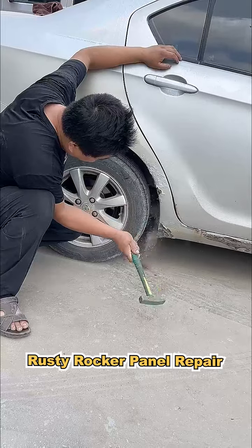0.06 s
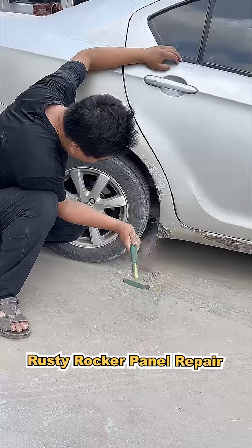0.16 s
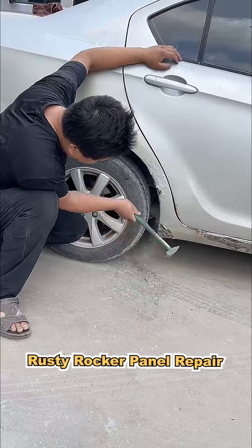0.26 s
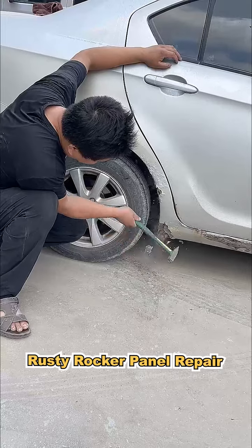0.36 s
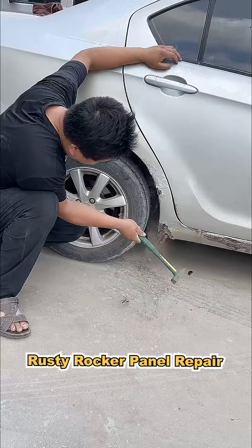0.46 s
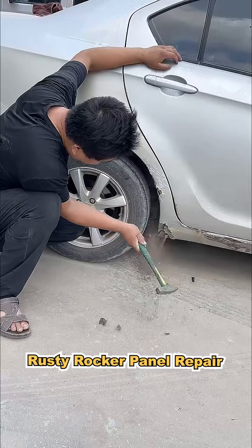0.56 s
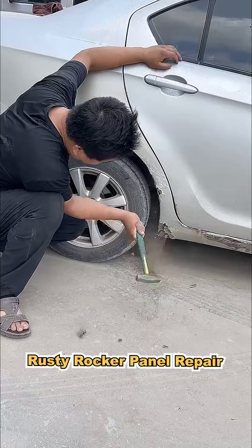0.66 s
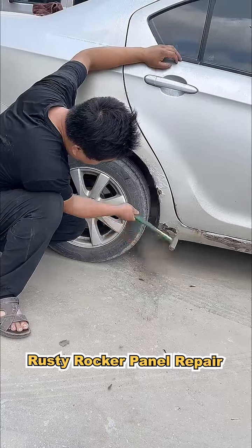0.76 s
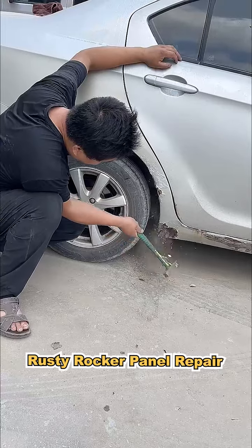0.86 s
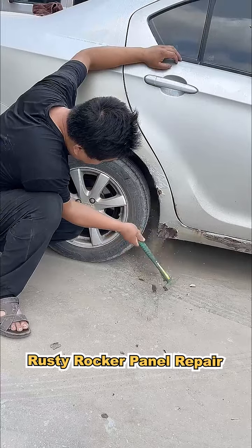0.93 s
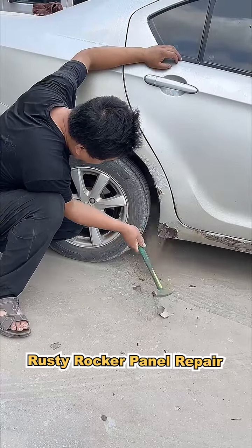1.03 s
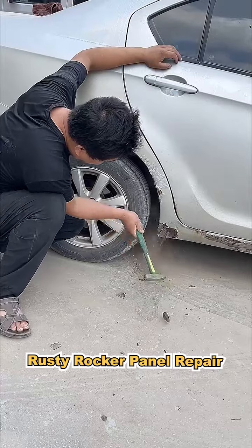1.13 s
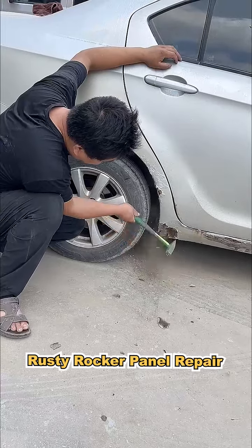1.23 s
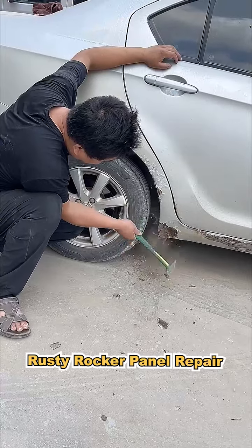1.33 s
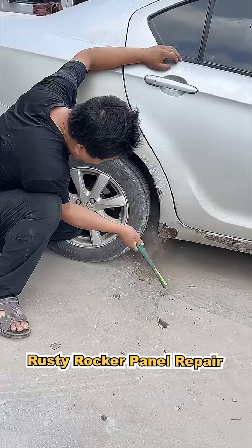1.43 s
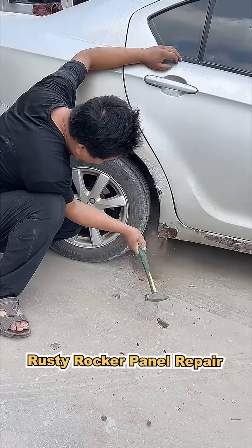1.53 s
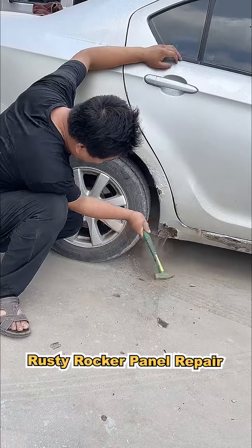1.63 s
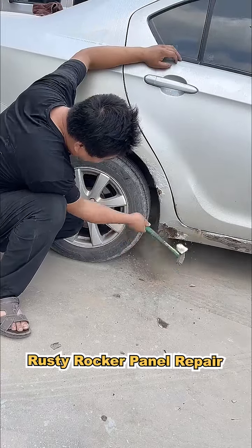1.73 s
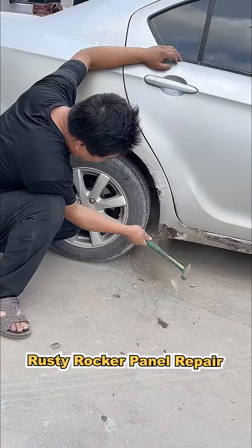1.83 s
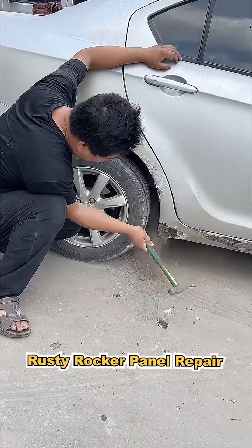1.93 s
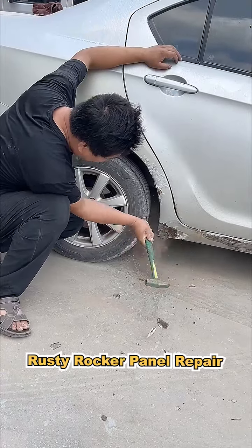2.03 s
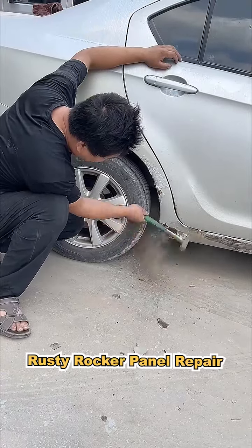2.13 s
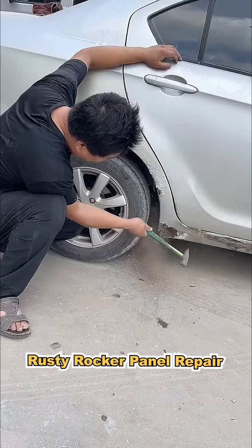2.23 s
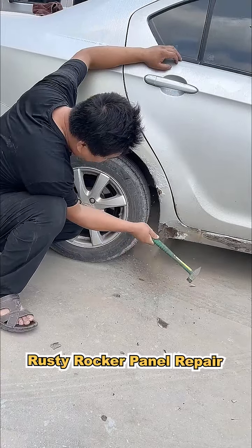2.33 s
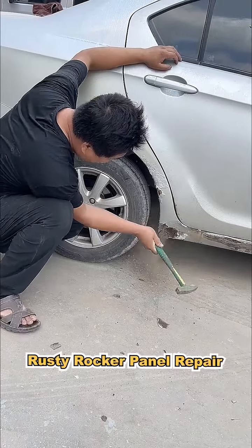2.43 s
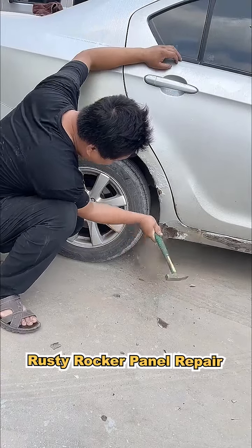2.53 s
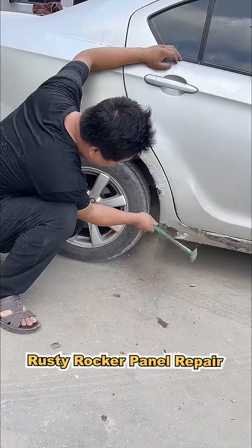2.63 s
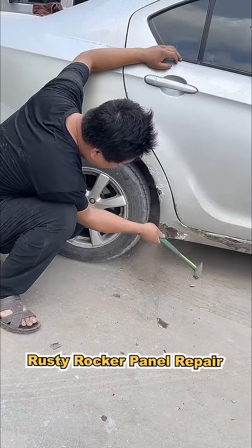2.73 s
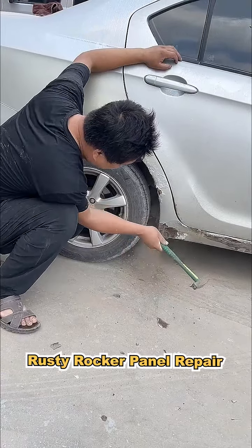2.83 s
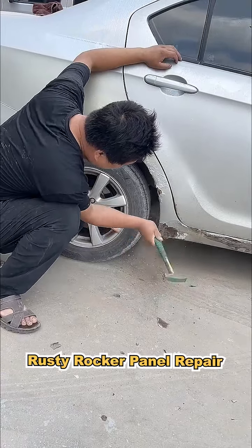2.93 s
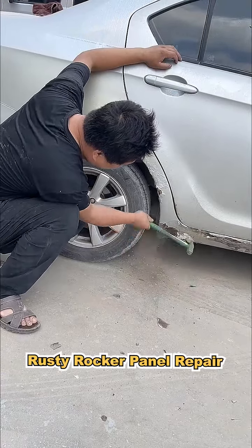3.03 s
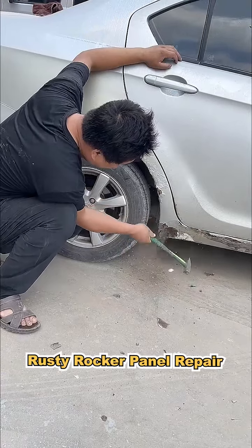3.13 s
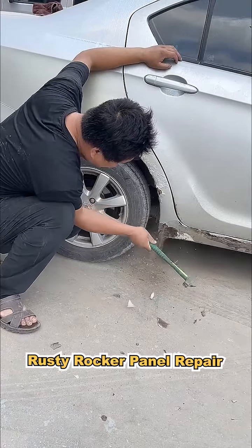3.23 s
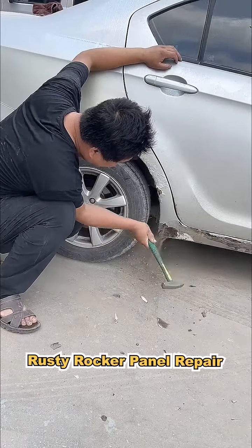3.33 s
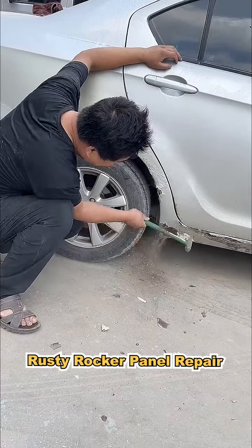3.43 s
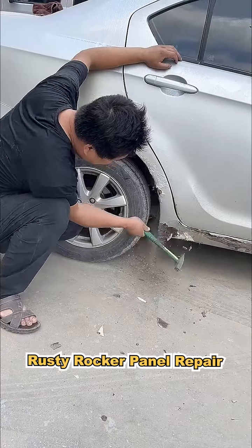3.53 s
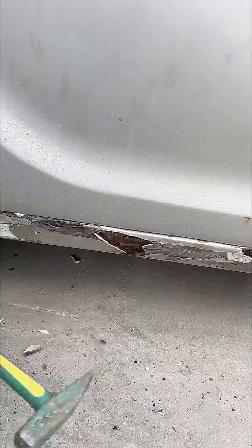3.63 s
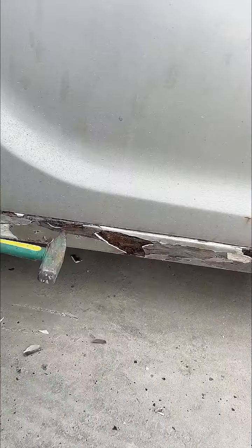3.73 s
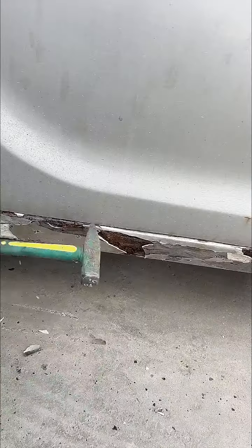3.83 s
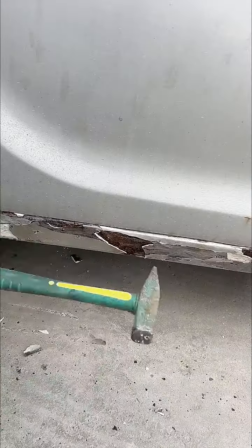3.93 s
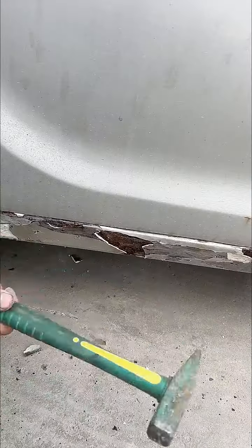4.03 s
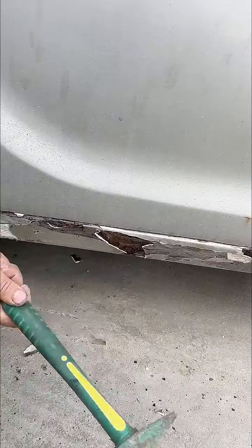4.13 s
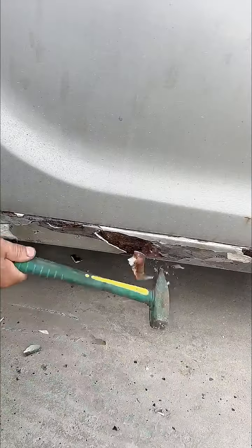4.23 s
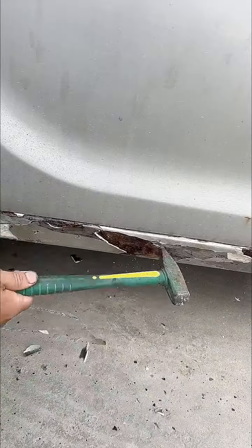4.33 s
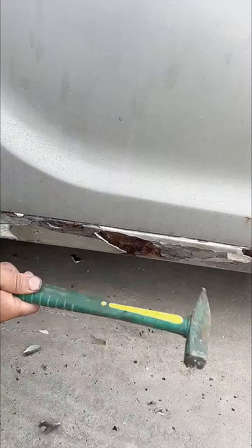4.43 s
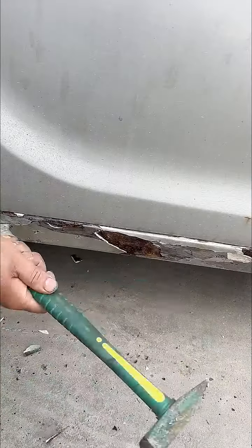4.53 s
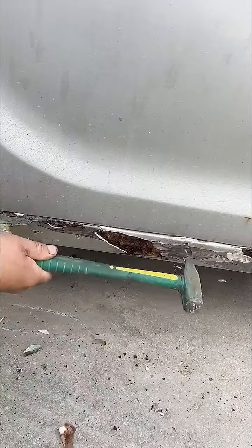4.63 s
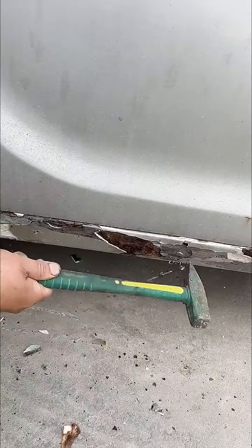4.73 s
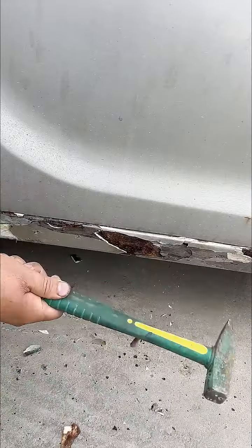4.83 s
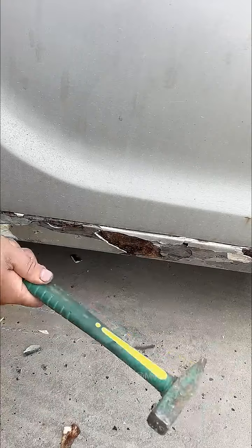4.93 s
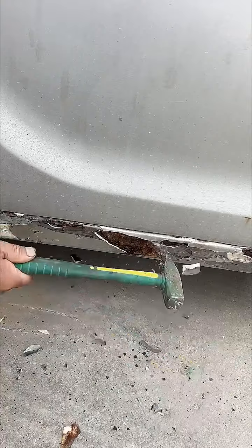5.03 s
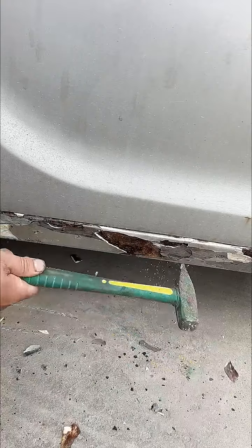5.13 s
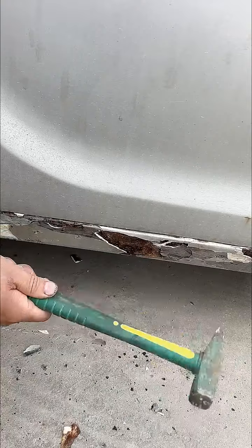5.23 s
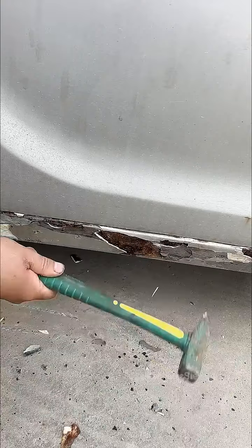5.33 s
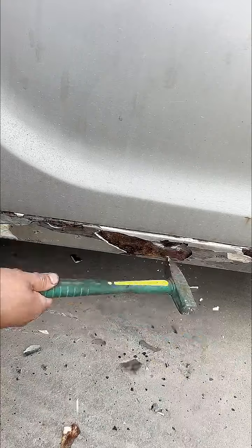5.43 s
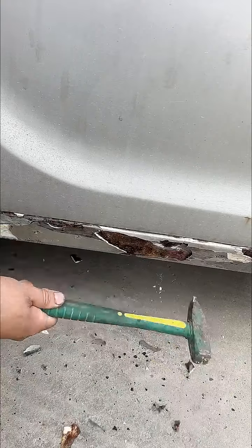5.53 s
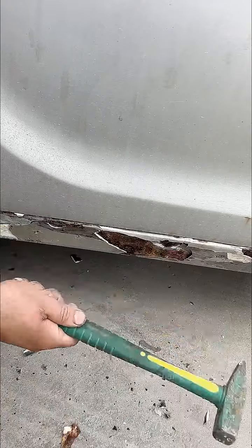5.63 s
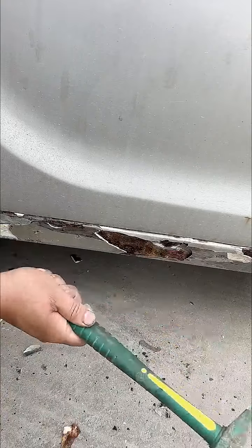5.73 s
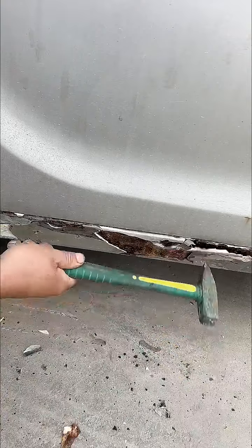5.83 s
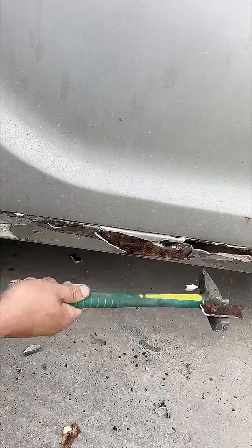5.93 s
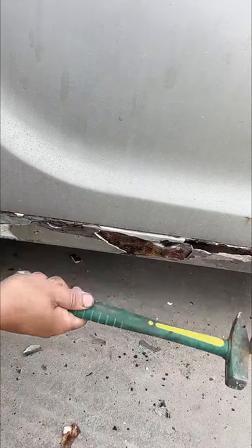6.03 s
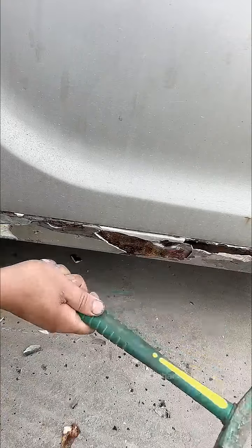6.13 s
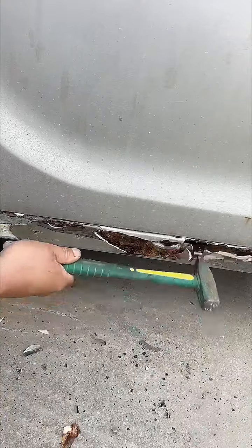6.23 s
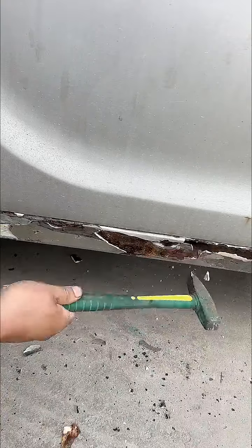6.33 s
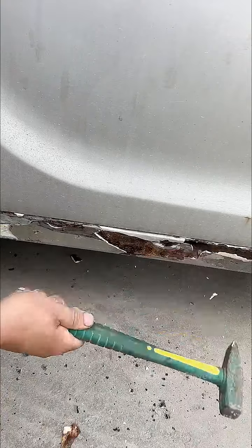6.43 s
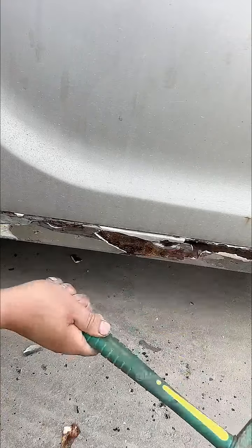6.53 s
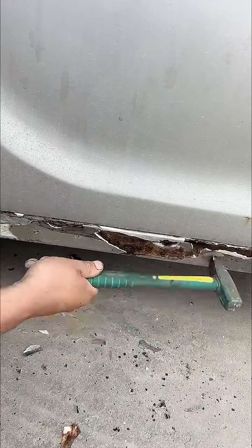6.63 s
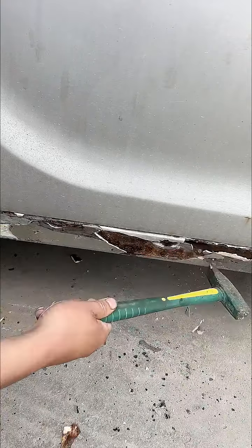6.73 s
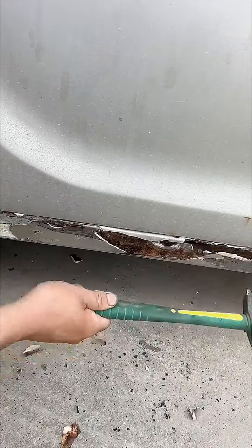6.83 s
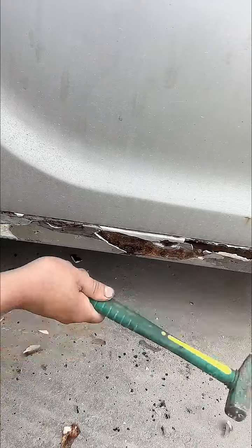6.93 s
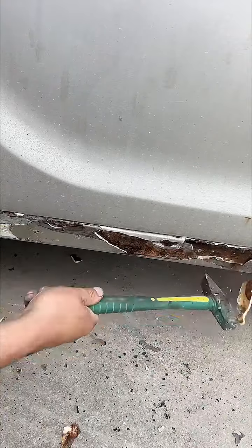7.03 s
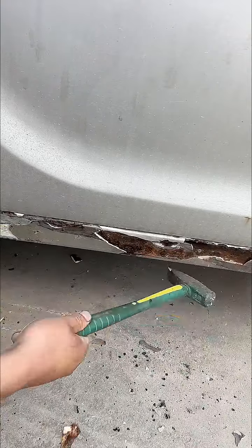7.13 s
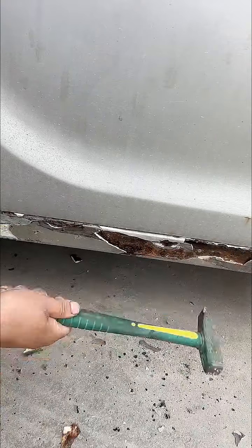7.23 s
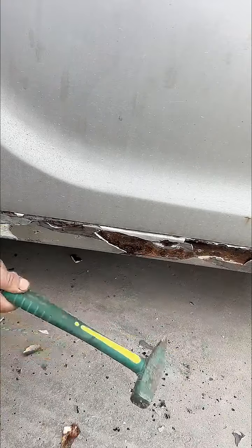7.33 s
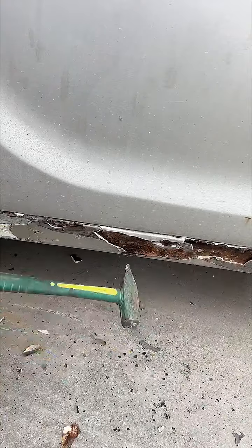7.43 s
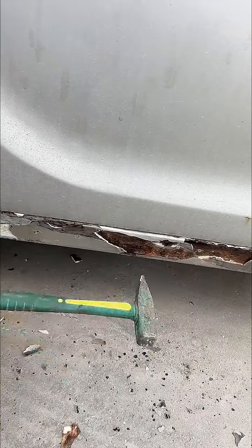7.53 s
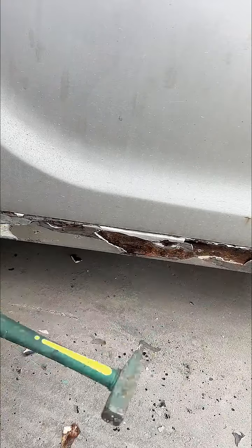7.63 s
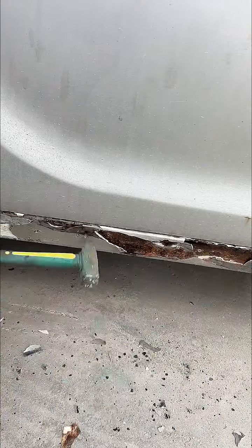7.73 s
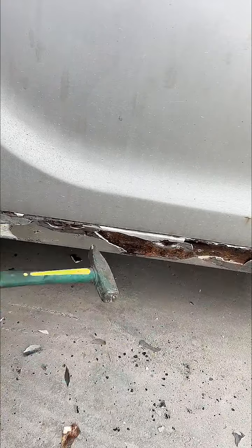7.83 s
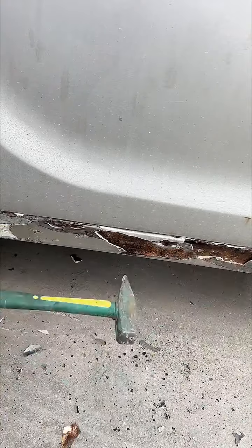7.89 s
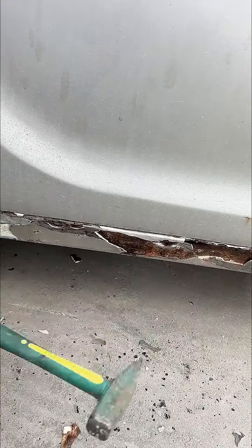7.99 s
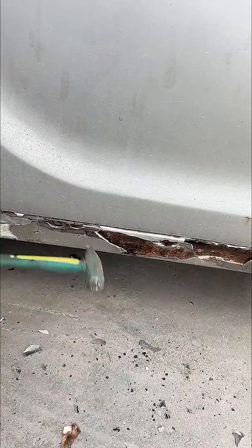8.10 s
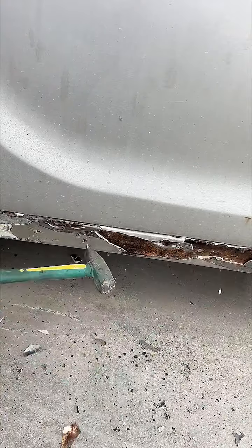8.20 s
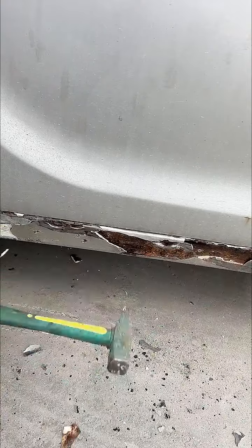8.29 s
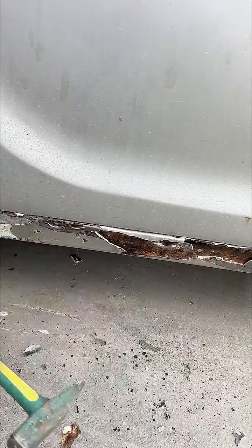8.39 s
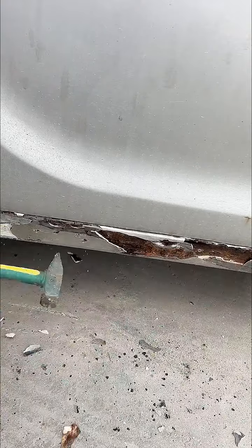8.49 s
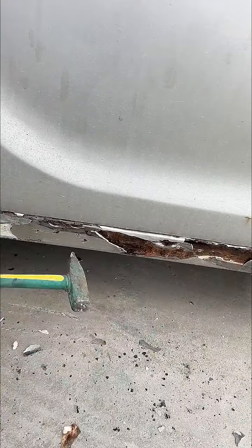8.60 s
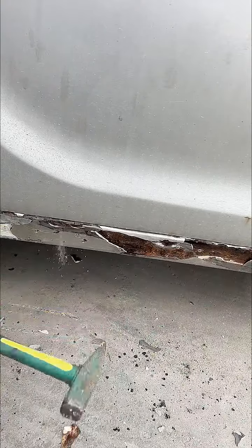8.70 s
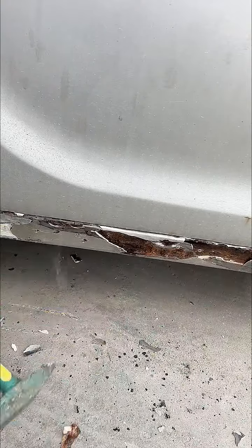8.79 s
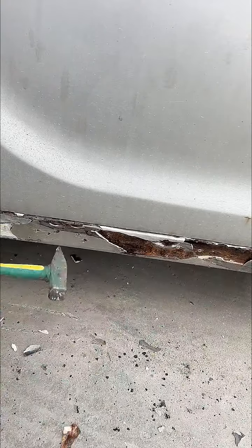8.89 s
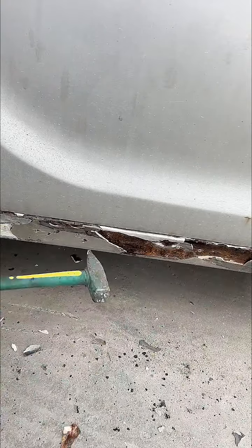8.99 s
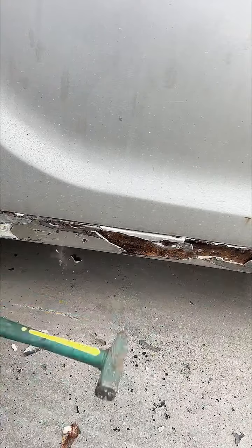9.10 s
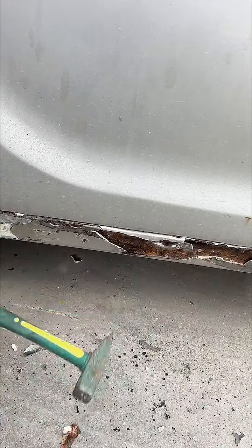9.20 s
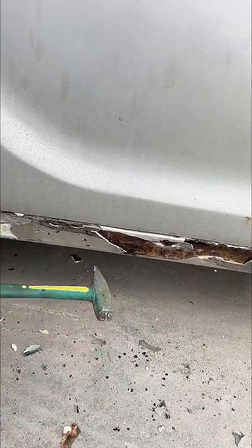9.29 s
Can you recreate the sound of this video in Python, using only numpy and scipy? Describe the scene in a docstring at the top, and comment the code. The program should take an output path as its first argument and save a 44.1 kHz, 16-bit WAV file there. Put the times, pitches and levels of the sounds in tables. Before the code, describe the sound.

Steady knocks on a corroded car panel outdoors: each a short low thump, a brief dull clank and a crunch of breaking rust. Eight blows ring with some yard reflection, then an abrupt cut brings the microphone near the sill, with boomy, dry hits and a very thin, high hammer ring. Chips snap and skitter, the hammer lightly clacks on the backswing, and low traffic noise stays behind.

```python
"""A small hammer knocks rust off a car in a concrete yard: first the wheel arch a few steps away, then the sill close up.
Each blow mixes crunching noise, a clanking and pinging sheet and a dull bending wave in the body; a wall answers.
Flakes and dust tick as short noise bursts; the hammer head rings thinly as decaying tones when the close view begins.
Behind it all, brief low drones swell and shaped noise makes distant traffic."""
import sys
import numpy as np
from scipy import signal
from scipy.fft import rfft, irfft, next_fast_len
from scipy.io import wavfile
from scipy.ndimage import uniform_filter1d, map_coordinates

SR = 44100
rng = np.random.default_rng(int(sys.argv[2]) if len(sys.argv) > 2 else 0)


def to_wav(s):
    """Save 16-bit WAV."""
    ch = np.atleast_2d(s).T  # columns
    pcm = np.round(np.clip(ch, -1, 1) * 32767)  # PCM
    wavfile.write(sys.argv[1], SR, pcm.astype(np.int16))


N = 412555
T = np.arange(SR * 6 // 10) / SR  # time line of one short sound, s
CLOSE_START = 3.632  # when the close view takes over, s

# In all tables t60 is the time to fade by 60 dB, and levels are relative: the mix adds further gains.
# Blows on each part; the spot struck sets boom, clank and rust relative to the strength.
# Columns: t/s, strength level/dB, boom level/dB, clank level/dB, rust level/dB, clank f/Hz, ping f/Hz
ARCH_BLOWS = [(.3512, -18.5, -11, -4, -6.5, 729, 1420), (.818, -23, -3.5, -4, -2, 722, 1600),
              (1.266, -18.5, -3.5, -3.5, -8.5, 650, 1500), (1.7447, -15, -4, -6.5, -6, 830, 1604),
              (2.1851, -15.5, -7, -10, -5.5, 784, 1480), (2.654, -16, -11.5, -5.5, -2, 748, 1415),
              (3.0846, -14, -13, -5, -7, 560, 1640), (3.5041, -14, -6.5, -0.5, -10, 740, 1970)]
SILL_BLOWS = [(3.7728, -17, -21, 2.5, -11, 746, 1530), (3.8345, -25.5, -1.5, 6.5, -18, 745, 1400),
              (4.2552, -20, -4.5, 4.5, -3.5, 783, 1400), (4.6517, -16.5, -1.5, 0.5, -3, 906, 2640),
              (5.0382, -18, -0.5, -1, -1, 692, 1300), (5.4089, -19, 0.5, 7.5, -5.5, 775, 2650),
              (5.8708, -15, -2.5, 0.5, -3, 835, 2083), (6.2772, -16, -3.5, 6.5, -2.5, 732, 1750),
              (6.6816, -13.5, -4, -0.5, -7, 692, 2830), (7.0409, -13.5, -9, 1, -7.5, 713, 3030),
              (7.1038, -25, -8, 8.5, -13.5, 1040, 1640), (7.434, -15.5, -16, -3.5, -8.5, 726, 1950),
              (7.7794, -13.5, -7.5, 2, -6, 796, 1960), (8.1552, -17, -10.5, 4, -2.5, 790, 2305),
              (8.518, -11, -15.5, -4, -11.5, 744, 2870), (8.8983, -11.5, -13, -3, -11, 742, 2710),
              (9.2958, -15, -23, -0.5, -7.5, 846, 3490)]
# Ringing modes of each panel, before small random shifts: f/Hz, level/dB, t60/s
ARCH_MODES = [(80.9, -12, 0.51), (111.3, 5.5, 0.14), (148.3, 0, 0.25), (227, -8.5, 0.3),
              (256.7, -2.5, 0.19), (340.5, -13, 0.21), (454, -12, 0.13), (645, -19, 0.15), (792, -5, 0.14),
              (1460, -10, 0.035), (1970, -23, 0.046), (3070, -14, .05)]
SILL_MODES = [(79.8, -6.5, 0.24), (152.3, 2.5, 0.24), (204, -2, 0.14), (230.5, -6.5, 0.29),
              (264.5, -4.5, 0.16), (322.8, -15.5, 0.27), (360.4, -13, 0.26), (398, -9, 0.12),
              (513, -12, 0.086), (690, -23, 0.38), (748, -10.5, 0.091), (2694, -14, 0.039)]
# Spectrum of the bending wave of a blow: f/Hz, level/dB
ARCH_PUSH = [(30, -63), (80, -31), (130, 4.5), (250, 5.5), (360, 0), (600, -34), (1200, -51)]
SILL_PUSH = [(30, -31), (90, -11.5), (160, 6), (240, 10), (290, 5), (370, -9.5), (600, -36.5), (1200, -67)]
# Dense upper modes of the rusty sheet: f/Hz, level/dB, t60/s
SHEET_MODES = [(430, -17, 0.12), (792, -6.5, 0.07), (1060, -6.5, 0.041), (1400, -5.5, 0.038),
               (2190, -6, 0.018), (2730, -4, 0.02), (3530, -6.5, 0.023), (5080, -0.5, 0.016),
               (7950, -3.5, 0.018), (14500, 1, 0.019)]
# Scatter from ground, car and walls: f/Hz, level/dB, t60/s
YARD_SCATTER = [(120, -1, 0.42), (286, 6.5, 0.37), (773, 3.5, 0.37), (1616, 1, 0.33), (3200, -6, 0.36),
                (5760, -7.5, 0.39), (14000, -9, 0.38)]
# The hammer glancing off the sill on its way back: t/s, clack level/dB, scratch level/dB
GLANCES = [(4.722, -37.5, -54), (5.4937, -27.5, -36), (5.9509, -34, -32.5), (6.3475, -23.5, -23),
           (7.8579, -24.5, -39.5), (8.2146, -25.5, -35.5), (8.6047, -26.5, -53), (8.9956, -28, -53)]
# Ringing modes of the hammer head: f/Hz, level/dB, t60/s
HEAD_MODES = [(7300, -50.5, 0.97), (7330, -50, 0.27), (10427, -54, 0.58), (14454, -49, .55),
              (14400, -47, .55)]
# Larger rust flakes snapping off and landing: t/s, level/dB, heft (dull body over sharp edge) level/dB
FLAKES = [(.286, -43.5, -3), (.535, -42, -8), (.554, -46, -6), (1.0944, -40.5, 0), (1.955, -41.5, 4),
          (2.156, -44, -8), (2.5857, -46, 8.5), (3.237, -39, -4), (3.264, -41.5, -6), (4.391, -40.5, -14),
          (4.4594, -51.5, 13.5), (4.9067, -50, -11), (5.2978, -46, 1), (5.7744, -52, 1), (6.424, -49, -18),
          (7.3946, -47, -5), (5.517, -38, -16), (5.625, -40.5, -11), (5.666, -37, -12), (5.9846, -39, -8),
          (6.496, -48.5, -11), (6.5251, -46.5, -10), (6.583, -41, 3.5), (7.2766, -34, -6.5),
          (7.9558, -50, -19)]
# Lowest and highest pitch of a flake: f/Hz, f/Hz
FLAKE_RANGE = (5000, 9460)
# Brief low drones: peak t/s, length t/s, peak level/dB, f/Hz
DRONES = [(2.021, .19, -28.5, 105), (2.597, 0.17, -44, 110), (3.868, 0.15, -31, 71), (3.85, .1, -27, 108)]
# Traffic in the wide view: t/s, level/dB
WIDE_TRAFFIC = [(0.0, -52), (0.34, -56), (0.46, -53), (1.9, -43), (2.47, -44.5), (2.73, -43), (3.45, -43)]
# Traffic in the close view: t/s, rumble level/dB, roar level/dB
CLOSE_TRAFFIC = [(3.66, -46.5, -50), (4.77, -44.5, -57), (6.69, -45, -55), (7.35, -39.5, -54.5),
                 (9.35, -42.5, -54)]
# Traffic spectra: f/Hz, level/dB (per Hz)
WIDE_RUMBLE = [(18, -37), (40, -5), (70, -3), (110, -2), (170, -7.5), (225, -6), (340, -22), (520, -40),
               (880, -120)]
WIDE_ROAR = [(150, -30), (250, -2.5), (350, -3), (550, -6.5), (780, -3.5), (1040, -6), (1250, -11.5),
             (2700, -18), (4570, -27), (9200, -32), (15000, -36.5)]
CLOSE_RUMBLE = [(20, -37), (32, -31), (45, 2), (75, -1), (120, -3.5), (180, -13), (300, -24.5), (520, -41),
                (880, -120)]
CLOSE_ROAR = [(120, -9.5), (230, -8), (350, -3), (500, -15.5), (700, -12), (1670, -17.5), (3000, -25.5),
              (4800, -33.5), (9000, -40.5), (16000, -40.5)]
# Microphone response: f/Hz, level/dB
MIC_RESPONSE = [(9800, -1.5), (11000, -13.5), (12500, -13.5), (14500, -6.5), (15700, -9), (16500, -35)]

USUAL_RUST_DB = -5  # an ordinary spot
CRACK_DB, CRACK_SHARE = -3.5, .15  # crack at an ordinary spot; extra dB for each dB of rust
RATTLE_SHARE = 0.21  # a crumbling spot also rattles in the low middle: dB for each dB of rust
DEEP_DB = -3.5  # colour at 80 Hz, alike for every blow
PING_OVERTONE = 2.05  # the ping's upper partial over its pitch
GLANCE_HZ = 782  # the clank of a light touch
TOP_HZ = 17000  # nothing passes from here up


def amp(db):
    """Turn decibels into a gain."""
    return 10 ** (np.asarray(db) / 20)


def unit(x):
    """Scale to an average (rms) level of 1."""
    return x / np.sqrt(np.mean(x ** 2) + 1e-20)


def along(points, hz):
    """Read a curve of (Hz, value) points joined on a log frequency axis."""
    f, value = np.transpose(points)
    return np.interp(np.log(hz + 1), np.log(f + 1), value)


def curves(rows):
    """Give one value per sample for each column after the time."""
    seconds, *columns = np.transpose(rows)
    return [np.interp(np.arange(N) / SR, seconds, column) for column in columns]


def filtered(x, response):
    """Reshape the spectrum of x by a gain that depends on frequency."""
    size = x.shape[-1]
    padded = next_fast_len(size + 4096)
    spectrum = rfft(x, padded) * response(np.fft.rfftfreq(padded, 1 / SR))
    return irfft(spectrum, padded)[..., :size]


def noise(spectrum, size):
    """Make coloured noise of rms 1."""
    return unit(filtered(rng.standard_normal(size), lambda hz: amp(along(spectrum, hz))))


def bands(centres):
    """Make overlapping bands of fresh noise, one row for each centre."""
    def share(hz):
        low_cut = hz / (hz + centres[0])
        peaks = np.eye(len(centres))
        return np.sqrt([along(list(zip(centres, row)), hz) * low_cut for row in peaks])
    return filtered(rng.standard_normal((len(centres), len(T))), share)


def fading_bands(modes, colour, envelope):
    """Sum noise bands at the modes, each with its own fade, tinted by a colour curve."""
    hz, db, t60 = np.transpose(modes)
    levels = amp(db + along(colour, hz))
    return sum(level * unit(band) * envelope(life) for level, band, life in zip(levels, bands(hz), t60))


def fade(t60, attack, delay=0):
    """A quick rise (attack in s) and an exponential decay."""
    t = np.maximum(T - delay, 0)
    return np.exp(-np.log(1000) * t / t60) * (1 - np.exp(-t / attack))


def ring(hz, t60, attack, delay=0):
    """One damped mode: a tone that dies away."""
    return np.sin(2 * np.pi * hz * (T - delay)) * fade(t60, attack, delay)


def add(track, s, sound):
    """Mix a sound in at time s."""
    start = max(round(s * SR), 0)
    track[start:start + len(sound)] += sound[:max(N - start, 0)]


def wheel_arch():
    """From a few steps away the yard is clearly heard."""
    return hammering(
        ARCH_BLOWS, ARCH_PUSH, ARCH_MODES, lag=0.00713, thump_db=5.5, modes_db=0.0,
        clank_db=6, clank_t60=0.036, ping_db=7.5, ping_t60=0.015, overtone_db=-6,
        sheet_db=5.5, buzz_db=-43, tail_db=-13.5, wall_db=-26.5, wall_s=.09)


def sill():
    """Close up the blows are drier and the hollow sill booms."""
    return hammering(
        SILL_BLOWS, SILL_PUSH, SILL_MODES, lag=0.01196, thump_db=9.0, modes_db=0.5,
        clank_db=10, clank_t60=0.035, ping_db=3.5, ping_t60=0.027, overtone_db=-12.5,
        sheet_db=6.5, buzz_db=-20, tail_db=-23.5, wall_db=-41.5, wall_s=0.11)


def hammering(blows, push, modes, lag, thump_db, modes_db, clank_db, clank_t60, ping_db, ping_t60,
              overtone_db, sheet_db, buzz_db, tail_db, wall_db, wall_s):
    """Each blow thumps and rings the body, clanks and pings at the spot's pitches, and crunches rust."""
    track = np.zeros(N)
    for s, strength, boom, clank, rust, clank_hz, ping_hz in blows:
        crack = CRACK_DB + CRACK_SHARE * (rust - USUAL_RUST_DB)
        rattle = RATTLE_SHARE * (rust - USUAL_RUST_DB)
        colour = [(80, DEEP_DB), (150, boom + 3), (220, 0), (400, rattle),
                  (800, clank), (1300, crack), (2800, crack), (5000, rust)]
        blow = amp(thump_db) * thump(push, lag)
        blow += amp(modes_db) * panel(modes, colour, lag)
        blow += amp(clank + clank_db) * ring(clank_hz, clank_t60, 0.0016)
        ping = ring(ping_hz, ping_t60, 0.0009)
        ping += amp(overtone_db) * ring(ping_hz * PING_OVERTONE, ping_t60, .0004)
        blow += amp(crack + ping_db) * ping
        blow += amp(sheet_db) * sheet(colour, gritty_db=4.5, buzz_db=buzz_db, buzz_t60=0.037)
        heard = blow + amp(tail_db) * yard(colour) + amp(wall_db) * wall(blow, wall_s)
        add(track, s, amp(strength) * heard)
        # the brittle crust gives way just before the head meets steel
        add(track, s - .0022, amp(strength + rust - 15.0) * crust())
    return track


def crust():
    """Breaking crust gives a short burst of broad noise."""
    return noise([(400, -7), (2000, -15), (9000, -14), (16000, -9)], len(T)) * fade(0.018, 0.0012)


def thump(push, lag):
    """Low bending waves travel slower, so the push arrives as a short falling chirp of peak 1."""
    hz = np.fft.rfftfreq(len(T), 1 / SR)
    phase = 2 * np.pi * lag * (2 * np.sqrt(200 * hz) - .15 * hz)  # lag in s scales the delay
    phase = phase * rng.uniform(.97, 1.03)
    wave = irfft(amp(along(push, hz)) * np.exp(-1j * phase), len(T))
    return wave / np.abs(wave).max()


def panel(modes, colour, lag):
    """The panel's modes build up once the bending wave has crossed it; the spot struck sets their balance."""
    total = np.zeros(len(T))
    for hz, db, t60 in modes:
        level_shift, pitch_shift, delay_shift = rng.standard_normal(3)
        level = amp(db + along(colour, hz) + 1.5 * level_shift)
        delay = lag * np.sqrt(200 / hz) * (1.1 + .2 * delay_shift)
        total += level * ring(hz * (1 + .012 * pitch_shift), t60, .005, delay)
    return total


def sheet(colour, gritty_db, buzz_db, buzz_t60):
    """Crushed rust sets off short upper modes in a gritty burst; loose scale buzzes briefly after it."""
    bumps = unit(uniform_filter1d(rng.standard_normal(len(T)), size=30))
    grit = unit(amp(gritty_db * bumps))

    def decay(life):
        return fade(life, 0.00037) + amp(buzz_db) * fade(buzz_t60 + life, 0.0056)
    return grit * fading_bands(SHEET_MODES, colour, decay)


def yard(colour):
    """Surfaces all around scatter the blow into a soft noise tail in its colour."""
    return fading_bands(YARD_SCATTER, colour, lambda life: fade(life, 0.013))


def wall(x, wall_s):
    """A wall sends back a dull, slightly smeared echo after wall_s seconds."""
    spectrum = [(150, -3.5), (280, 8), (800, -7.5), (2000, -11.5), (10000, -17.5)]
    smear = noise(spectrum, len(T)) * fade(0.015, 0.0018, wall_s)
    return signal.fftconvolve(x, smear / np.linalg.norm(smear))[:len(T)]


def glances(crack_db=-16, clack_share=0.32, scratch_share=0.34, clank_db=2):
    """Light second touches clack and scratch without shaking the body."""
    track = np.zeros(N)
    for s, clack, scratch in GLANCES:
        crack = crack_db + clack_share * clack + scratch_share * scratch
        colour = [(300, clack + 10), (900, clack - 5.5), (2500, crack), (8000, scratch)]
        touch = amp(4.5) * sheet(colour, gritty_db=2.5, buzz_db=-24, buzz_t60=.05)
        touch += amp(clack + clank_db) * ring(GLANCE_HZ, 0.053, 0.0022)
        add(track, s, touch + amp(-26.5) * yard(colour))
    return track


def hammer_head():
    """The steel head rings on, thin and high, wavering as it swings."""
    track = np.zeros(N)
    for hz, db, t60 in HEAD_MODES:
        waver = amp(2.9 * unit(noise([(5, -8), (25, 8), (90, -60), (300, -120)], len(T))))
        add(track, CLOSE_START, amp(db) * ring(hz, t60, 0.0066) * waver)
    return track


def flakes(count=2):
    """Brittle chips tick, ring for an instant and skitter on in count fainter bounces."""
    track = np.zeros(N)
    for s, level_db, heft_db in FLAKES:
        hz = rng.uniform(*FLAKE_RANGE)
        for bounce in range(count + 1):
            body = noise([(1000, -24), (2000, -7.5), (4000, -1), (7000, -11.5)], len(T))
            body *= amp(heft_db + 2) * fade(0.019, 0.00027)
            edge = noise([(3000, -12), (7000, -6.5), (15000, 7)], len(T))
            edge *= fade(0.014, 0.00027) + amp(-22.5) * fade(0.16, .003)
            chip = body + amp(12.0) * (edge + .5 * ring(hz, 0.0071, 0.00023))
            landing = s + bounce ** 2 * rng.uniform(0.0022, 0.0034)
            add(track, landing, amp(level_db - 10 * bounce) * chip)
    return track


def dust(blows, speck_db, fall_s, count=4, fading_db=22, rust_share=0.96):
    """Specks of rust patter down after each blow, late ones fainter; a crumbling spot sheds louder ones."""
    track = np.zeros(N)
    for s, _, _, _, rust, *_ in blows:
        for fall, smallness, pitch in rng.random((count, 3)):
            hz = 5000 + 9000 * pitch
            speck = noise([(hz / 3, -20), (hz, 0), (hz * 2, -6)], len(T)) * fade(0.02, 0.00012)
            level_db = speck_db + rust_share * rust - 7 * smallness - fading_db * fall
            add(track, s + .025 + fall_s * fall, amp(level_db) * speck)
    return track


def drones():
    """A low, slightly unsteady tone swells and sinks."""
    track = np.zeros(N)
    t = T - T.mean()  # 0 at the peak
    for s, length, db, hz in DRONES:
        drift = 0.46 * noise([(3, -11), (12, -6), (40, -40), (200, -120)], len(T))  # radians
        swell = np.exp(-(2 * t / length) ** 2)
        add(track, s - T.mean(), amp(db) * swell * np.sin(2 * np.pi * hz * t + drift))
    return track


def traffic(low, high, rumble, roar, rumble_db, roar_db, swell_db):
    """Distant traffic: an uneven rumble under a smooth roar, following the level curves low and high."""
    # a smooth curve through 8 random points per second
    swell = map_coordinates(rng.standard_normal(N * 8 // SR + 4), [np.arange(N) * 8 / SR])
    deep = amp(low + rumble_db + swell_db * swell) * noise(rumble, N)
    return deep + amp(high + roar_db) * noise(roar, N)


def scene():
    """The wide view gives way abruptly to the close one; drones and flakes run through both."""
    close = np.clip((np.arange(N) / SR - CLOSE_START) / .01 + .5, 0, 1)  # 10 ms crossfade
    (wide_level,) = curves(WIDE_TRAFFIC)
    rumble_level, roar_level = curves(CLOSE_TRAFFIC)
    wide_view = wheel_arch() + dust(ARCH_BLOWS, speck_db=-31, fall_s=.14)
    wide_view += traffic(wide_level, wide_level, WIDE_RUMBLE, WIDE_ROAR,
                         rumble_db=4.5, roar_db=2.5, swell_db=0.8)
    close_view = sill() + glances() + hammer_head() + dust(SILL_BLOWS, speck_db=-42.5, fall_s=.17)
    close_view += traffic(rumble_level, roar_level, CLOSE_RUMBLE, CLOSE_ROAR,
                          rumble_db=1, roar_db=4, swell_db=2.0)
    views = (1 - close) * wide_view + close * close_view
    return (views + drones() + flakes())[None]


def record(dry):
    """A phone microphone with a treble dip rounds off the loudest peaks."""
    x = filtered(dry, lambda hz: amp(along(MIC_RESPONSE, hz)))
    x = x / (1 + np.abs(x / .66) ** 6) ** (1 / 6)  # peaks level off towards .66
    return filtered(x, lambda hz: hz < TOP_HZ)


dry = scene()
out = record(dry)
to_wav(out)
```